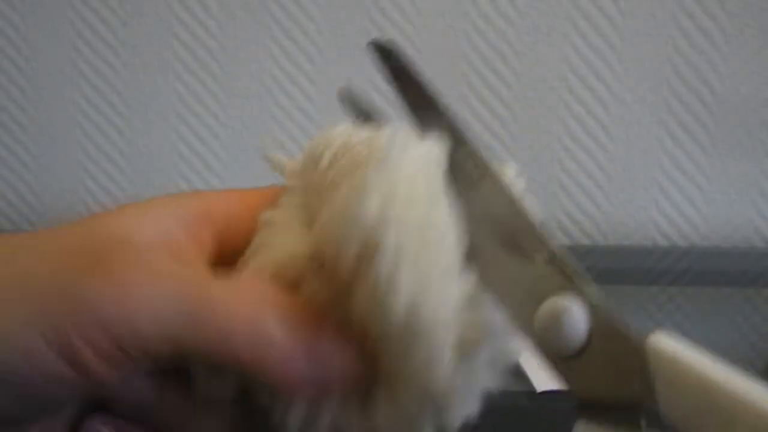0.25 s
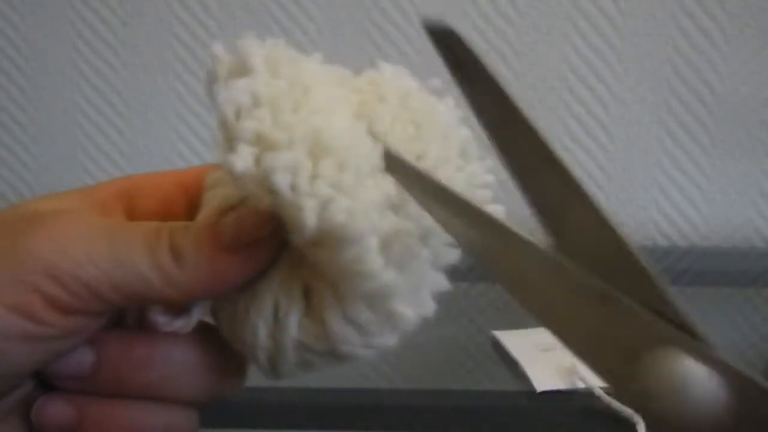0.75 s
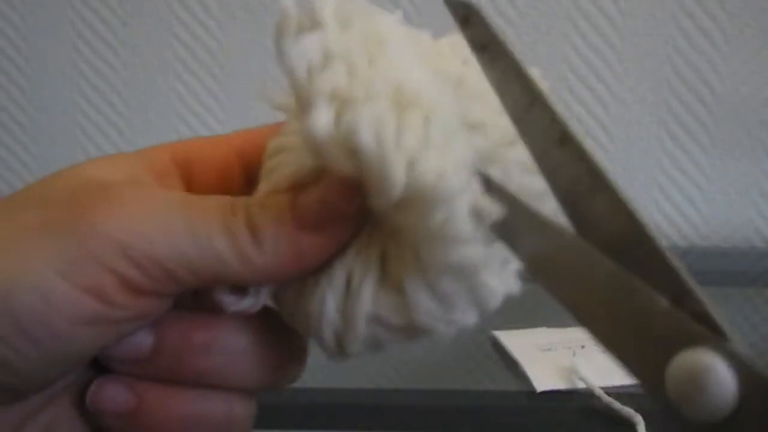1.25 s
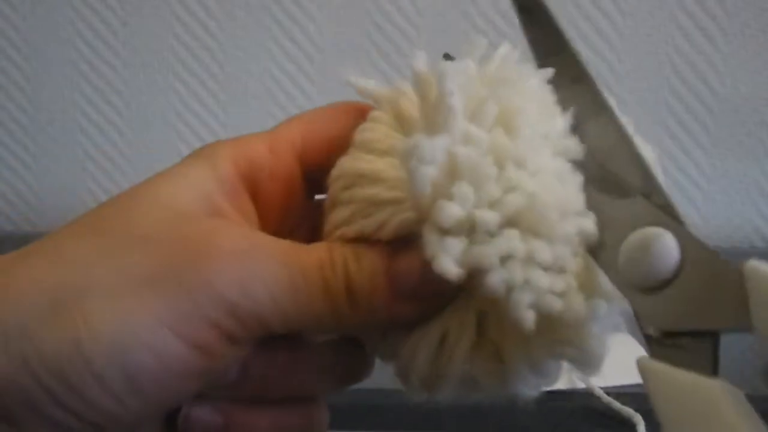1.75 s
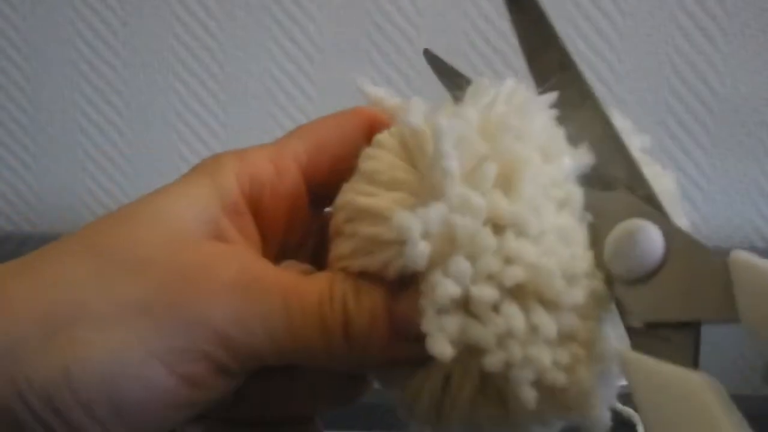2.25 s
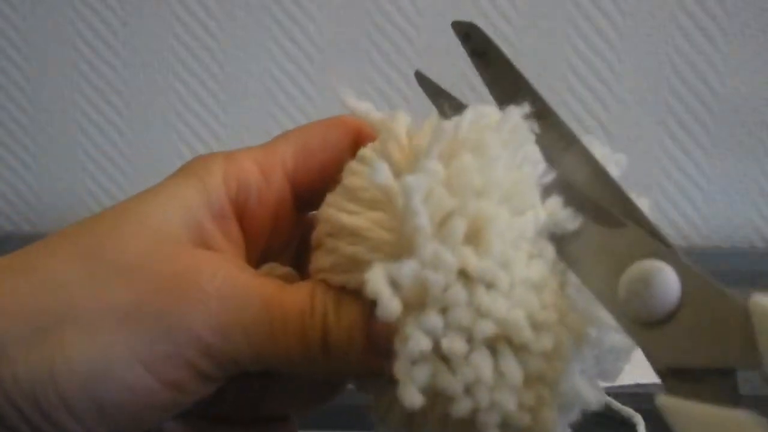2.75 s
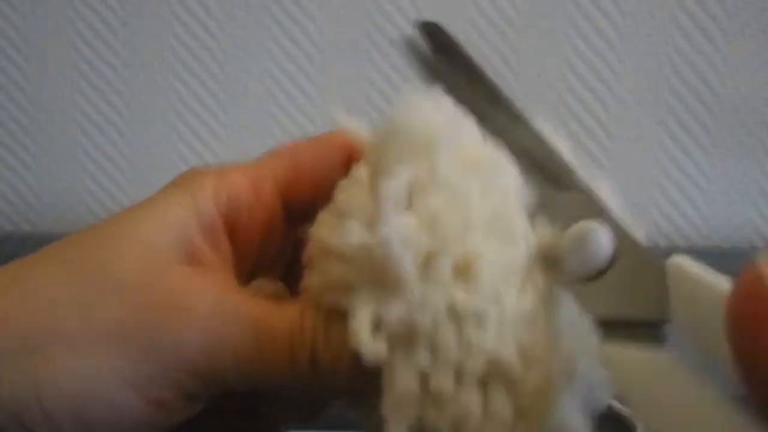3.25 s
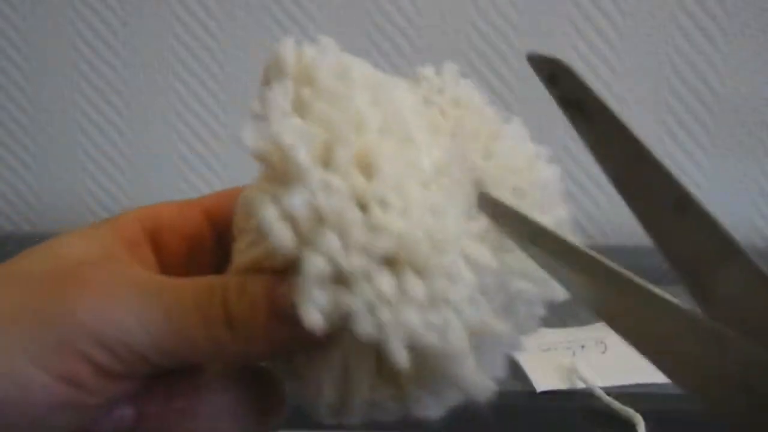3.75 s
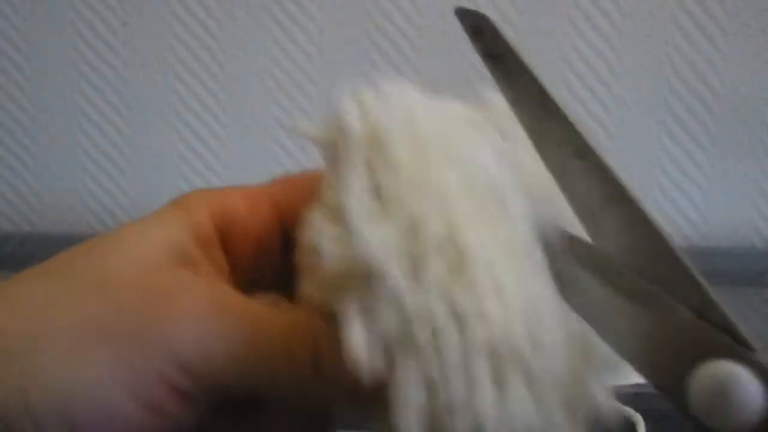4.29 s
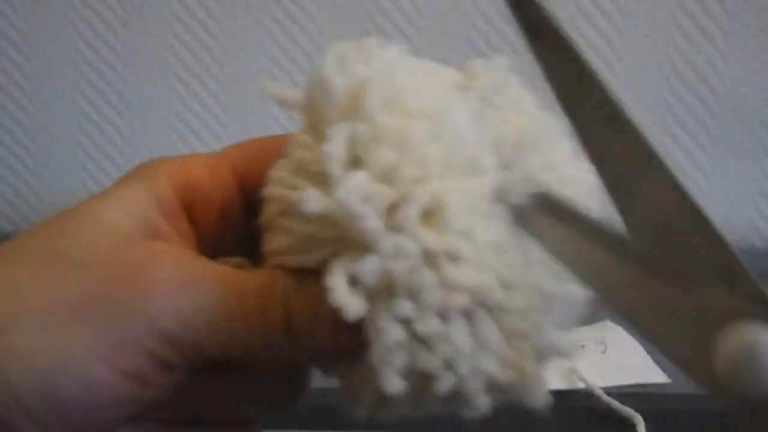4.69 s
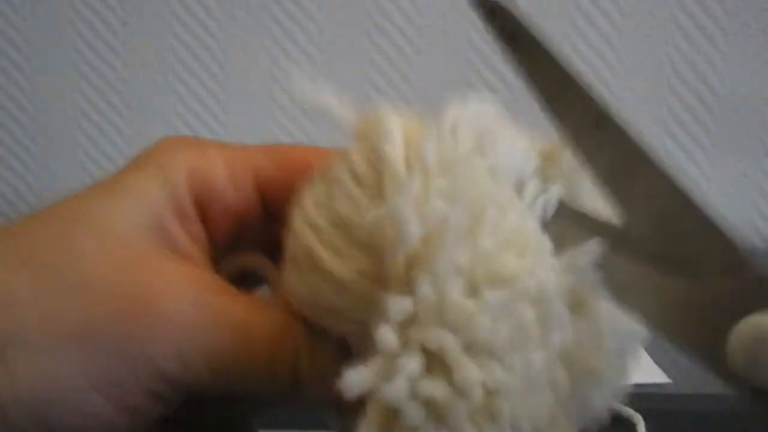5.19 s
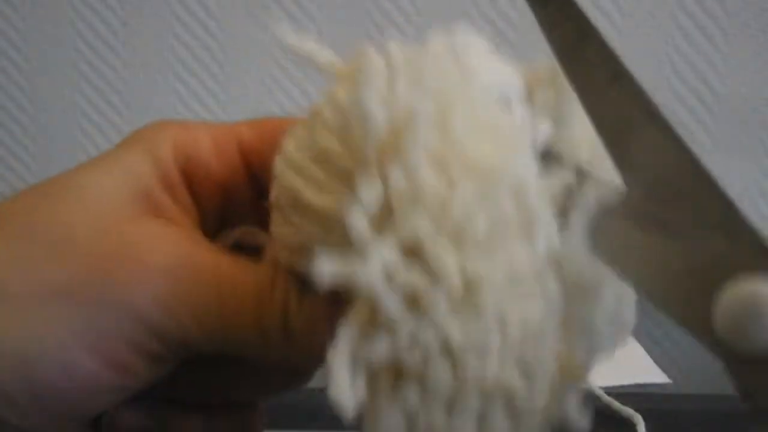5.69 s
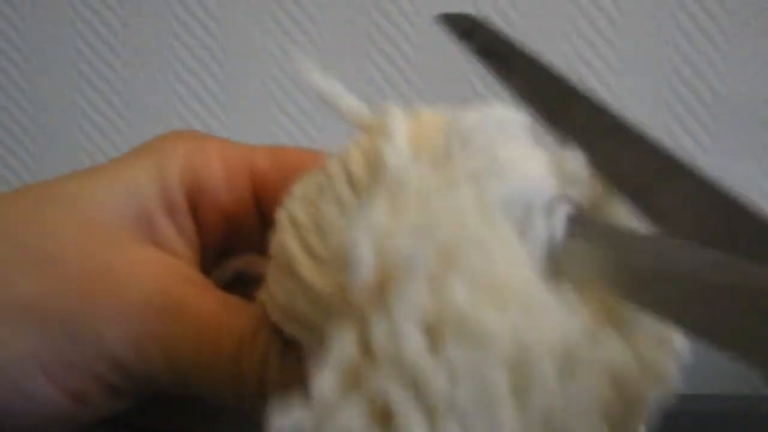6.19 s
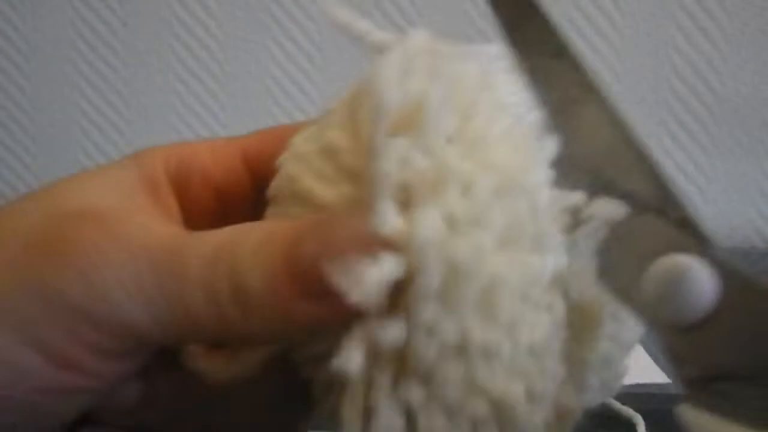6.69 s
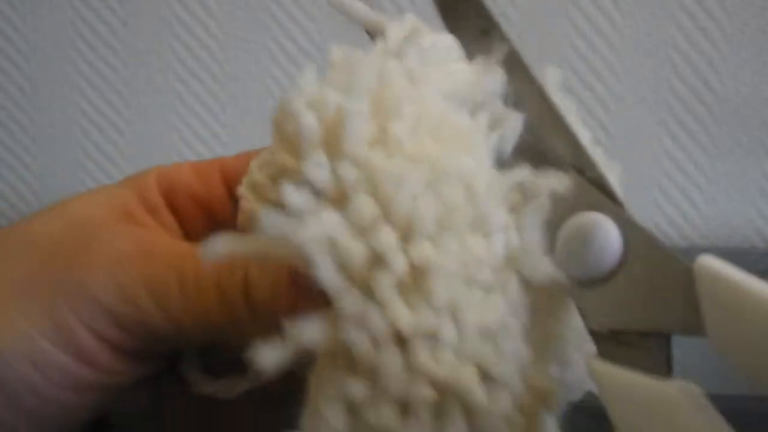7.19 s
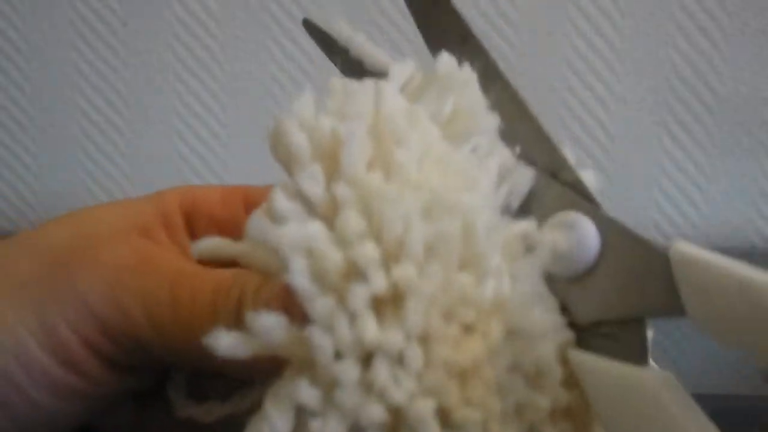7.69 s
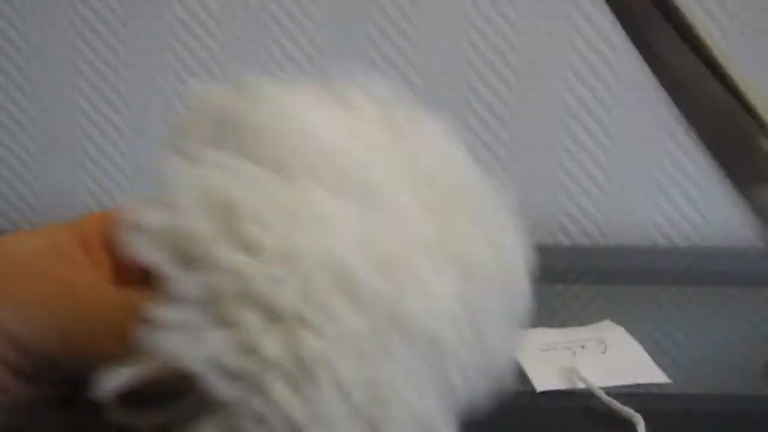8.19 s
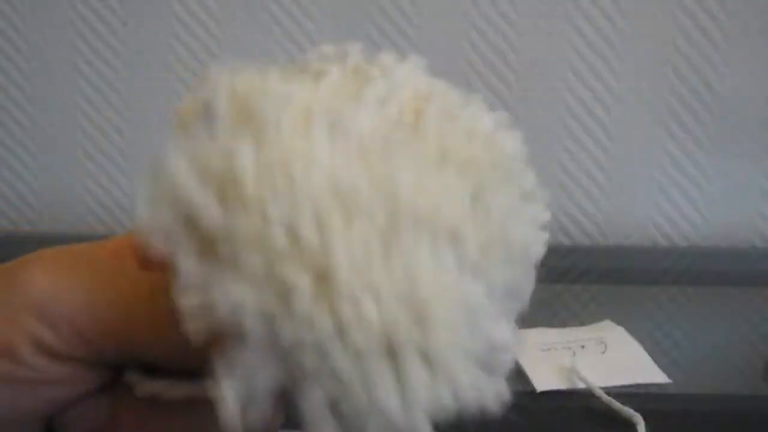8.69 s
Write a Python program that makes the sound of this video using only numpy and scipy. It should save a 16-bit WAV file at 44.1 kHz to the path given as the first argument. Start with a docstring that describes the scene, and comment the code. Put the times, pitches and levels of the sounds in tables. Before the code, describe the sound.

Dry, fibrous crunches of scissors parting yarn, heard close up in a small quiet room. After a hard metallic snap with a rustling tail, cutting continues in irregular groups. Then come only soft blade-on-wool slides, small ticks and dull knocks over growing far traffic, before fresh crunching and a final loud snap settle into near quiet.

```python
"""Quiet room, microphone close to steel scissors that work through the wool loops of a pompom.
From the start fibres part in gritty strokes that ring the blade modes, with a hard snap near 0.6 s.
Filtered grit makes soft slides under the loops, alone but for faint ticks and knocks from 3.5 to 7 s.
Far traffic, shaped noise, swells meanwhile; cutting resumes at 7 s, the blades snap hard again near 8 s,
and a broad rustling tail follows each hard snap. A narrow dip near 7.8 kHz runs through the whole sound."""
import sys
import numpy as np
from scipy import signal
from scipy.fft import rfft, irfft
from scipy.io import wavfile
from scipy.ndimage import uniform_filter1d

SR = 44100
rng = np.random.default_rng(int(sys.argv[2]) if len(sys.argv) > 2 else 0)


def int16_out(signal):
    """Quantize to a 16-bit WAV file."""
    q = np.round(np.clip(np.atleast_2d(signal).T, -1, 1) * 32767)
    wavfile.write(sys.argv[1], SR, q.astype(np.int16))


N = 394510

# Pushes of the closing blades: (full force from [s], rise [s], hold [s], fall [s], force [dB],
# low modes [dB], body modes [dB], high modes [dB], factor on the blade modes [ratio])
CUT_STROKES = [(0.001, .003, 0.043, 0.0263, -38, -7, -8.5, -5, 1.03),
               (0.092, .09, 0.0027, 0.077, -40.5, -14, -3.5, -4.5, 0.92),
               (0.237, 0.0654, .003, 0.11, -46.5, -16, -2.5, -9, 0.99),
               (0.363, .07, 0.025, 0.077, -41.5, -7.5, -1.8, -5, 0.92),
               (0.559, 0.014, 0.026, .006, -39.5, -11, 1, -8.5, 0.93),
               (1.816, 0.0357, 0.12, 0.044, -37, -6, -10, -14.5, 0.95),
               (1.961, 0.049, 0.077, 0.059, -39.5, -4.5, -6.5, -10, 0.952),
               (2.437, .012, 0.095, 0.15, -39.5, -3, -7, -12, 0.94),
               (2.643, 0.071, .003, 0.072, -43.5, 0.1, -2, -2.5, 0.893),
               (2.72, 0.053, 0.0655, 0.116, -56.5, -1, -1, -1.5, 0.88),
               (2.854, .07, 0.024, .06, -53, -7, -4, -1, 0.907),
               (2.95, 0.036, 0.0188, .03, -56, -7, -6, -0.5, 0.9),
               (3.26, .06, 0.08, .012, -38.5, -4, -6.5, -12.5, 1),
               (3.341, .01, .003, .11, -46.5, -3, -4.4, 0.5, .95),
               (7.085, .03, 0.034, 0.054, -49, -5, -12, -14, 1.04),
               (7.129, .05, 0.133, .02, -45.5, 0, -6.5, -8.5, 1.01),
               (7.283, 0.032, 0.0024, 0.05, -34.5, -2, -9, -12, .97),
               (7.382, .04, .003, .055, -42.5, -4.5, -10, -9.5, 1.05),
               (7.766, 0.029, .02, 0.076, -47.5, -9.5, -16.5, -19.5, 1.06),
               (7.897, 0.152, .003, .09, -38, -1.5, -8, -7.5, .99),
               (7.975, 0.076, .003, .02, -30.5, -8.5, -9, -9, 0.94)]
# Short dense bursts of parting strands; the one at 1.335 s is the gritty edge of a steel ping:
# (time [s], level [dB], length [s], body and high modes [dB])
GRITTY_BURSTS = [(0.368, -25, 0.015, -5.5), (0.566, -36, 0.0075, -1), (0.576, -32, 0.0088, 6),
                 (1.335, -39, 0.0098, -9.5), (1.823, -35, 0.043, -15), (1.91, -34.5, 0.025, -16.5),
                 (1.985, -37.5, 0.013, -15), (2.016, -28, 0.014, -8.5), (2.455, -41.5, 0.006, -10),
                 (2.49, -35.5, 0.019, -13), (2.631, -40.5, 0.03, -6), (3.248, -38, 0.0122, -14.5),
                 (3.277, -35, 0.02, -7), (3.302, -26, 0.016, -11), (3.326, -24, 0.014, -6),
                 (7.266, -31, 0.03, -10), (7.382, -37, 0.017, -10), (7.897, -38, 0.022, -16),
                 (7.975, -27, 0.022, -9), (7.992, -24, 0.0173, -7), (7.998, -30, 0.024, -2.5)]
# Blade modes under the fibres, before the pitch factor, three rows a group:
# (frequency [Hz], width [Hz], level within its group [dB])
BLADE_MODES = [(1582, 190, -3), (1904, 650, 7), (2274, 220, -2.5), (2827, 850, 4.5), (3628, 1313, 11),
               (4590, 370, 5.5), (5630, 798, 2.5), (6314, 394, -1.5), (6678, 950, 5), (8340, 430, 2),
               (9410, 640, 0.5), (10120, 640, 1), (11350, 1520, -3.5), (13000, 4000, -1),
               (15300, 1200, -19)]
# Soft slides, and the broad rustling tails after the two hard snaps (0.597 and 8.02 s):
# (full level from [s], rise [s], hold [s], fall [s], level [dB],
# brightness [dB: band round 2130 Hz lowered, the rest raised], hollow ring [dB])
SLIDES_AND_TAILS = [(0.597, .006, .003, 0.132, -44.5, 0, -3.5),
                    (0.689, .013, .003, 0.039, -41.5, 0.5, -19.5),
                    (1.122, 0.084, .05, .035, -54.5, 0.1, -10), (1.262, 0.041, .003, .045, -55.5, 3.5, -10),
                    (1.372, .008, .03, .05, -47, 2.5, -12), (1.43, .09, .09, 0.154, -43, .8, -14),
                    (1.6, 0.0538, .003, .13, -45, 0.8, -16), (2.168, 0.0231, .08, 0.16, -48, 1.2, -12.5),
                    (3.086, .016, 0.0527, 0.041, -45.5, 3, -8.5),
                    (3.455, .12, .003, .025, -50.5, -1, -15.5), (4.012, 0.064, .003, 0.036, -58.5, 7, -11),
                    (4.166, 0.051, .003, 0.182, -46.5, 2, -14.5), (4.358, .03, 0.11, 0.0555, -46, 3, -2.5),
                    (4.629, 0.022, 0.13, 0.16, -58.5, 3, -10.5), (5.034, .06, 0.072, .09, -43, 3, -7),
                    (5.289, 0.0374, 0.033, 0.22, -55.5, 4, -13.5),
                    (5.524, 0.1, .003, 0.082, -48.5, 2.5, -13.5), (5.813, .01, .003, 0.129, -47, 1.37, -28),
                    (6.124, 0.217, .003, .025, -63, 7, -8), (6.301, 0.21, .01, 0.065, -49.5, 4.5, -14),
                    (6.508, 0.018, .01, 0.33, -54, 2, -15.5), (6.935, 0.32, .003, 0.112, -51.5, 3, -24),
                    (7.556, 0.046, 0.038, 0.047, -48.5, 4, -16),
                    (8.02, 0.00316, .003, 0.205, -48.5, 1.5, -7.5), (8.861, .15, .05, .05, -65, -7, -7)]
# Wool rubbing on steel: (frequency [Hz], density [dB per Hz])
WOOL_SPECTRUM = [(530, -8), (900, -3.5), (1620, 2), (3430, -3.5), (3820, -7.5), (4360, -7.5), (6640, -9.5),
                 (7860, -16), (9420, -22), (16000, -30.5)]
# Steel meeting steel: (time [s], level [dB], low modes [dB], high modes [dB], after-ring [dB],
# factor on pitch [ratio])
STEEL_CONTACTS = [(.5793, -24, 4, -18, -38, 1.13), (0.584, -1.5, 2.5, -28, -41.5, 0.975),
                  (0.689, -28, -1, -17, -35.5, 0.82), (0.794, -43, -9, -20, -40, 0.85),
                  (1.3375, -31, -20, -15, -45, .92), (1.3397, -15.5, -11, -26.5, -50.5, 0.84),
                  (1.3426, -27, -15, -20, -35, 0.8), (1.37, -29, -11, -25, -42.5, .9),
                  (1.3808, -34, -8, -25, -40, 0.85), (1.397, -28.5, -8.5, -25, -40, 0.85),
                  (2.396, -34, -5.5, -25, -40, 0.6), (2.403, -36.5, -8, -25, -40, .75),
                  (3.3348, -23.5, 7.5, -15, -35, 0.98), (4.352, -35, 0, -28, -40, 1.08),
                  (4.678, -33, -20, -25, -40, 0.94), (5.163, -40, -15, -15, -40, 1.3),
                  (8.0064, -32.5, 14.5, -10, -40, 0.85), (8.0137, 2, -2, -11.5, -40, 0.96),
                  (8.028, -28, -6, -12, -40, 0.706), (8.033, -18, -16, -6, -38, 0.83),
                  (8.912, -33.5, -2.5, -20, -38, 0.79)]
# Modes of the struck steel, before the pitch factor: (frequency [Hz], level [dB], t60 of a 0 dB tick [s])
STEEL_MODES = [(830, -53, 0.0023), (1600, -61, 0.0046), (2700, -16.5, 0.0184), (2915, 0.5, 0.0078),
               (4820, -2.5, 0.0049), (5920, 7, 0.0039), (7340, 3, 0.00294), (8970, 6.5, 0.0041),
               (10800, 0.5, 0.0032), (14000, 7, 0.0028)]
# Cut ends springing apart after a snap: (frequency [Hz], density [dB per Hz])
FIZZ_SPECTRUM = [(1500, -32), (3500, -6), (4800, 2), (7000, 0), (10000, -5), (16000, -21)]
# Low knocks, some under the snaps: (time [s], level [dB], pitch [Hz], t60 [s])
LOW_KNOCKS = [(0.013, -38, 845, 0.091), (0.577, -24, 930, 0.036), (0.586, -31, 197, 0.04),
              (3.332, -28, 330, 0.035), (3.796, -43.5, 277, 0.49), (3.975, -39, 540, 0.167),
              (5.81, -33, 400, 0.12), (5.838, -32, 454, 0.071), (8.013, -31, 300, 0.0316)]
# Far traffic: (frequency [Hz], density [dB per Hz])
ROAD_SPECTRUM = [(12, -45), (20, -27), (81, -8.5), (114, -12), (167, -1.5), (226, -0.5), (265, -6.5),
                 (440, -4.5), (672, -9.5), (1030, 5), (1340, -6), (1570, -9), (2500, -41), (3250, -52),
                 (5500, -120)]
# Tyre roar as traffic draws nearer: (time [s], level [dB])
ROAR_LEVEL = [(0, -57), (.6, -69), (1.6, -59.5), (2.8, -57.5), (3.3, -53), (4.4, -53), (6.0, -47),
              (7.1, -44.5), (7.8, -45), (8.2, -49), (8.95, -45.5)]
# Deepest bass from outside: (time [s], level [dB])
DEEP_LEVEL = [(0, -70.5), (1.6, -83), (2.8, -77), (3.5, -75), (5.2, -77), (6.1, -57), (7.3, -69.5),
              (8.95, -71)]
# Room modes in the rumble: (frequency [Hz], width [Hz], level [dB])
RUMBLE_MODES = [(238.2, 16.6, -9.5), (291, 19, -12), (440, 23, -11), (533.05, 30, -15)]
# Room and microphone floor: (frequency [Hz], density [dB per Hz])
HISS_SPECTRUM = [(180, -26), (300, -19), (636, -9.5), (790, -12.5), (2190, -16.5), (2590, -18), (3380, -19),
                 (6810, -23.5), (7910, -25.5), (13500, -30), (16200, -32)]

SWING_DB = 22  # climb over one rise time, drop over one fall time
BEND = 1.1  # above 1 the shoulders of a movement are round
# For each dB below full force the modes beside the middle group gain [dB] in the fall, lose [dB] in the climb
SOFT_SHARE, LEAD_SHARE = 0.16, 0.15
# Modes drift as the cutting point travels [share, rms] and start high [share per dB below full force]
PITCH_DRIFT, LEAD_PITCH = 0.02, 0.0015
TOP_UNDER_DB = 8.5  # top modes below the high ones in a stroke
CRUNCH_PITCH = 0.9381  # factor on the blade modes
HOLLOW_HZ, HOLLOW_WIDTH_HZ = 4410, 860  # ring of the blade inside the ball
DECAY_DB_PER_STEP = 73  # a tick weaker by this much rings half as long
RING_HZ, RING_WIDTH_HZ, RING_T60_S = 2550, 450, 0.47  # rough after-ring near 2.6 kHz following a snap
ROOM_DB, ROOM_T60_S, ROOM_TOP_HZ = -24, 0.3, 5000
RUMBLE_DB, RUMBLE_UNDER_DB = -56.5, 4  # ever-present part; part below the roar that passes with it
DRONE_DB, DRONE_UNDER_DB = -62, 15  # the same for the drone
DRONE_HZ, DRONE_WIDTH_HZ, DRONE_MODE_DB = 112.9, 18, -1.5  # lowest room mode, in the drone
HISS_DB = -55.5
DIP_HZ, DIP_WIDTH_HZ, DIP_DEPTH = 7840, 1000, 0.86  # narrow dip through the whole sound; share lost there
FULL_SCALE, EDGE_HZ = 0.95, 15900  # overload level; top of the band


def cut(full_s, rise, hold, fall, force_db, low_db, body_db, high_db, factor):
    """Fibres part in uneven clumps while the blades close."""
    s, shape_db = stroke(full_s, rise, hold, fall)
    count = len(shape_db)
    climbing = s + np.arange(count) / SR < full_s
    soft_db = np.where(climbing, LEAD_SHARE, -SOFT_SHARE) * shape_db
    drift = PITCH_DRIFT * wander(count, size=3000)
    factor = factor + drift - LEAD_PITCH * climbing * shape_db
    clumps = gain_of(2.0 * wander(count, size=150))
    drive = clumps * grit(count, per_s=12000, spread_db=2.0)
    groups_db = [db + soft_db for db in (low_db, body_db, high_db, high_db - TOP_UNDER_DB)]
    rung = blades(drive, *groups_db, factor)
    return s, gain_of(force_db + shape_db) * rung * signal.windows.tukey(count, 0.15)


def crunch(level_db, length, side_db):
    """A short dense burst of grit on the blade modes swells quickly and dies away."""
    u = np.arange(0, length, 1 / SR) / length
    drive = grit(len(u), per_s=16000, spread_db=1.5)
    swell = np.sin(np.pi * u ** 0.46)
    return gain_of(level_db) * swell * blades(drive, -12, side_db, side_db, side_db - 6.0, CRUNCH_PITCH)


def blades(drive, low_db, body_db, high_db, top_db, factor):
    """The drive rings five groups of blade modes; each mode wavers as the cutting point travels."""
    rung = []
    for hz, width, db in BLADE_MODES:
        waver_db = 1.8 * wander(len(drive), size=2500)
        rung.append(gain_of(db + waver_db) * evened(resonate(drive, hz * factor, width)))
    groups = [evened(sum(rung[k:k + 3])) for k in range(0, len(rung), 3)]
    groups_db = (low_db, body_db, 0, high_db, top_db)
    return sum(gain_of(db) * group for db, group in zip(groups_db, groups))


def slide(full_s, rise, hold, fall, level_db, bright_db, hollow_db):
    """Soft dense rustle with a hollow ring: a slide of blade on wool, or the tail of a hard snap."""
    s, shape_db = stroke(full_s, rise, hold, fall)
    drive = grit(len(shape_db), per_s=16000, spread_db=1.2)
    rub = coloured(drive, WOOL_SPECTRUM)
    dull = resonate(rub, 2130, 3400)
    rub = dull * gain_of(-bright_db) + (rub - dull) * gain_of(bright_db)
    hollow = gain_of(hollow_db) * evened(resonate(drive, HOLLOW_HZ, HOLLOW_WIDTH_HZ))
    return s, gain_of(level_db + shape_db) * (rub + hollow) * signal.windows.tukey(len(drive), 0.15)


def snap(level_db, low_db, high_db, ring_db, pitch):
    """A tick rings the steel for a few ms; a rough, slower after-ring near 2.6 kHz follows."""
    t = np.arange(SR // 2) / SR
    decay = 2 ** (level_db / DECAY_DB_PER_STEP)
    group_db = [low_db] * 4 + [0] * 3 + [high_db] * 3
    tick = 0
    for side_db, (hz, mode_db, t60) in zip(group_db, STEEL_MODES):
        fade_db = -60 * t / (t60 * decay)
        tick = tick + gain_of(side_db + mode_db + fade_db) * np.sin(2 * np.pi * hz * pitch * t)
    contact = 1 - np.exp(-(t / 0.000423) ** 2)  # the edges meet over a fraction of a millisecond
    ring = evened(resonate(rng.standard_normal(len(t)), RING_HZ, RING_WIDTH_HZ))
    ring = gain_of(-60 * t / RING_T60_S) * ring
    fizz = gain_of(2.0 - 60 * t / 0.342) * coloured(rng.standard_normal(len(t)), FIZZ_SPECTRUM)
    after = gain_of(ring_db) * (ring + fizz) * (1 - np.exp(-t / 0.00184))
    return gain_of(level_db) * (contact * tick + after)


def knock(level_db, hz, t60):
    """A dull, toneless low knock: a broad noise resonance that dies away."""
    t = np.arange(8000) / SR
    thud = evened(resonate(rng.standard_normal(len(t)), hz, 0.754 * hz))
    return gain_of(level_db - 60 * t / t60) * thud * (1 - np.exp(-t / 0.0036))


def room(near):
    """A short, dull tail of decaying noise follows the first wall."""
    t = np.arange(SR // 2) / SR
    tail = rng.standard_normal(len(t)) * gain_of(-60 * t / ROOM_T60_S) * (t > 0.006)
    tail = signal.lfilter(*signal.butter(1, ROOM_TOP_HZ, fs=SR), tail)
    return gain_of(ROOM_DB) * signal.fftconvolve(near, tail / np.linalg.norm(tail))[:N]


def traffic():
    """Far tyre roar carries rumble and drone along; the deepest bass swells on its own."""
    t = np.arange(N) / SR
    roar = gain_of(np.interp(t, *np.transpose(ROAR_LEVEL)))
    rumble = np.hypot(gain_of(RUMBLE_DB), roar / gain_of(RUMBLE_UNDER_DB))
    drone = np.hypot(gain_of(DRONE_DB), roar / gain_of(DRONE_UNDER_DB))
    deep = gain_of(np.interp(t, *np.transpose(DEEP_LEVEL)))
    road = coloured(rng.standard_normal(N), ROAD_SPECTRUM)
    under_680, under_125, under_66, under_42 = (
        signal.sosfiltfilt(signal.butter(4, hz, fs=SR, output="sos"), road) for hz in (680, 125, 66, 42))
    boom = sum(gain_of(db) * evened(resonate(rng.standard_normal(N), hz, width))
               for hz, width, db in RUMBLE_MODES)
    mode = evened(resonate(rng.standard_normal(N), DRONE_HZ, DRONE_WIDTH_HZ))
    sound = roar * evened(road - under_680)
    sound += rumble * (evened(under_680 - under_125) + boom)
    sound += drone * (evened(under_125 - under_66) + gain_of(DRONE_MODE_DB) * mode)
    return sound + deep * evened(under_42)


def hiss():
    """Steady shaped noise is the floor of the room and the microphone."""
    return gain_of(HISS_DB) * coloured(rng.standard_normal(N), HISS_SPECTRUM)


def grit(count, per_s, spread_db):
    """Random clicks of uneven size, as of single fibres letting go."""
    size = rng.exponential(1, count)
    when = rng.random(count)
    sign = rng.standard_normal(count)
    return evened(gain_of(spread_db * np.minimum(size, 5)) * sign * (when < per_s / SR))


def stroke(full_s, rise, hold, fall):
    """Start time and shape in dB of a movement: climb, hold, sink."""
    rise, hold, fall = np.maximum((rise, hold, fall), 1e-3)
    start = max(full_s - 1.5 * rise, 0)
    t = np.arange(start, full_s + hold + 1.5 * fall, 1 / SR) - full_s
    away = np.maximum(np.maximum(-t / rise, (t - hold) / fall), 0)
    return full_s + t[0], -SWING_DB * away ** BEND


def wander(count, size):
    """Slow chance of about rms 1, changing over about size samples."""
    noise = rng.standard_normal(count + size)
    return evened(uniform_filter1d(uniform_filter1d(noise, size), size))[:count]


def resonate(x, hz, width):
    """Shifts hz down to zero, smooths twice, shifts back: a steep resonance that may glide."""
    turn = np.exp(2j * np.pi * np.cumsum(hz * np.ones(len(x))) / SR)
    r = np.exp(-np.pi * width / SR)
    once = signal.lfilter([1 - r], [1, -r], x / turn)
    return 2 * (turn * signal.lfilter([1 - r], [1, -r], once)).real


def coloured(x, points):
    """Filters x by a curve of (frequency [Hz], level [dB]), at rms 1."""
    f, db = np.transpose(points)
    hz = np.fft.rfftfreq(len(x), 1 / SR)
    curve = gain_of(np.interp(np.log(hz + 1), np.log(f + 1), db))
    return evened(irfft(rfft(x) * curve, len(x)))


def gain_of(db):
    """Decibels to gain."""
    return 10 ** (np.asarray(db) / 20)


def evened(x):
    """Scales to rms 1."""
    return x / np.sqrt(np.mean(x ** 2) + 1e-20)


def add(mix, s, sound):
    """Mixes a sound in at s seconds."""
    part = mix[max(round(s * SR), 0):][:len(sound)]
    part += sound[:len(part)]


def scene():
    """Scissors and wool near the microphone, the room and the street behind."""
    near = np.zeros(N)
    for play, strokes in ((cut, CUT_STROKES), (slide, SLIDES_AND_TAILS)):
        for row in strokes:
            add(near, *play(*row))
    for play, events in ((crunch, GRITTY_BURSTS), (snap, STEEL_CONTACTS), (knock, LOW_KNOCKS)):
        for s, *settings in events:
            add(near, s, play(*settings))
    return (near + room(near) + traffic() + hiss())[None]


def record(dry):
    """A narrow dip near 7.8 kHz, overload on the loudest snaps, then the band limit."""
    spot = signal.lfilter(*signal.iirpeak(DIP_HZ, DIP_HZ / DIP_WIDTH_HZ, SR), dry)
    heard = np.clip(dry - DIP_DEPTH * spot, -FULL_SCALE, FULL_SCALE)
    band = signal.firwin(511, EDGE_HZ, window=("kaiser", 9), fs=SR)
    return signal.oaconvolve(heard, band[None], "same")


dry = scene()
out = record(dry)
int16_out(out)
```